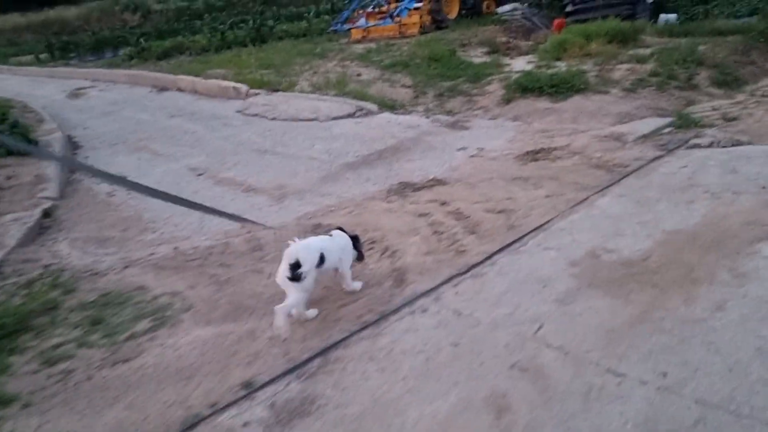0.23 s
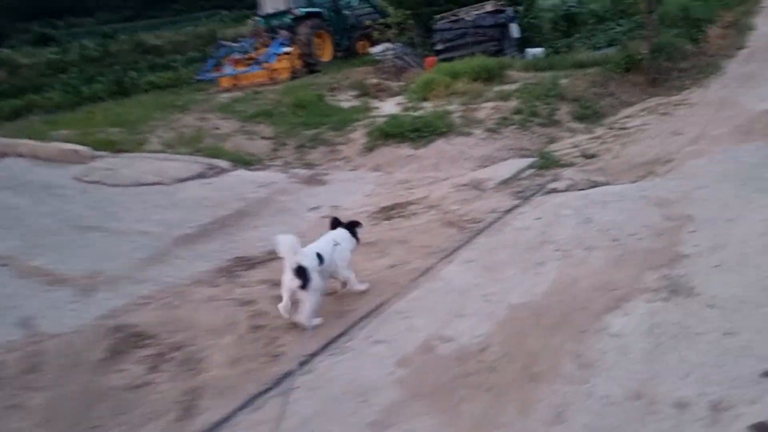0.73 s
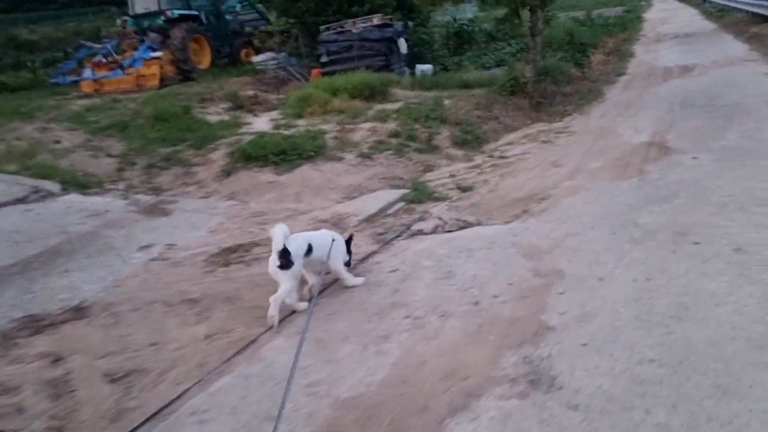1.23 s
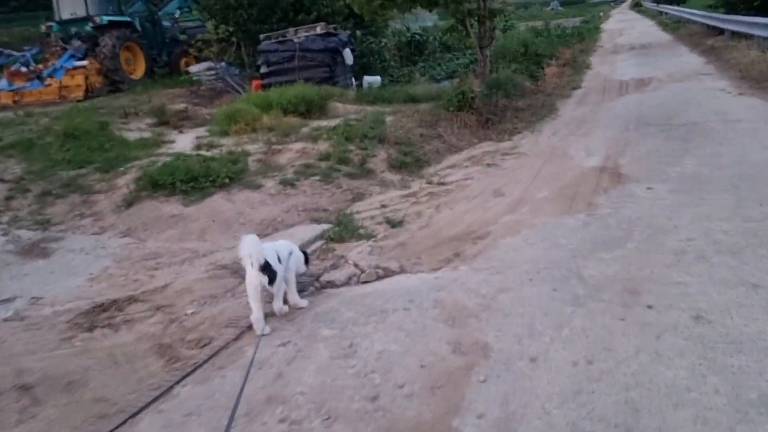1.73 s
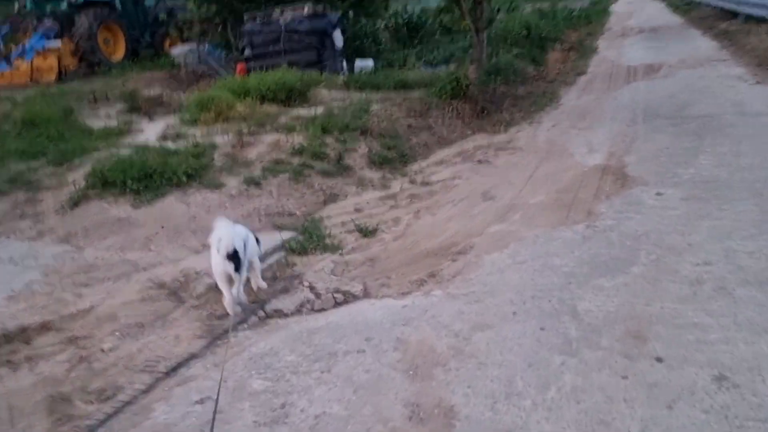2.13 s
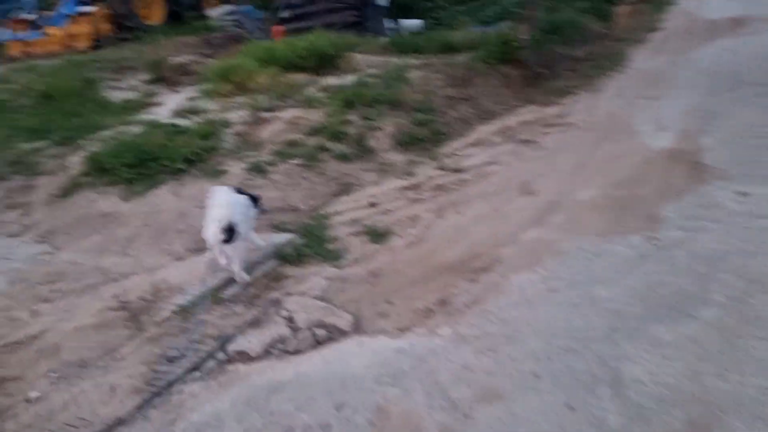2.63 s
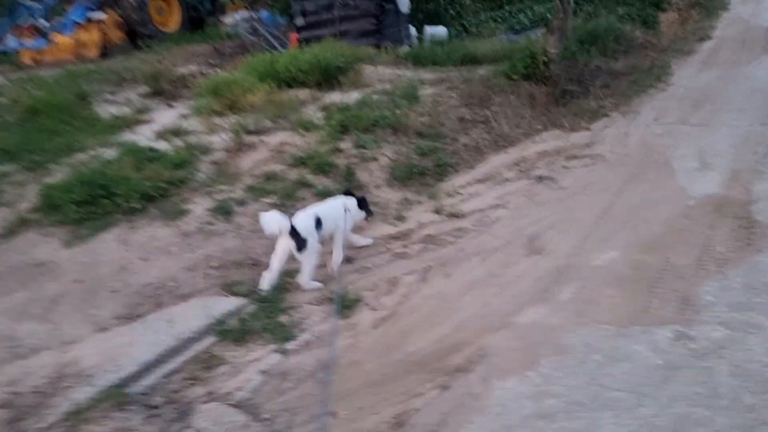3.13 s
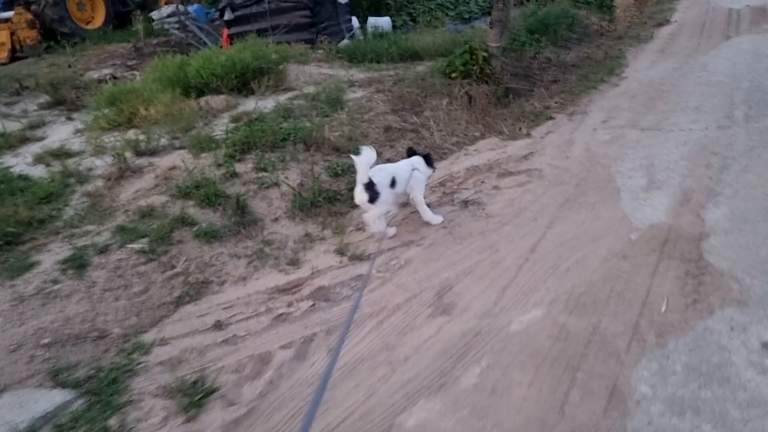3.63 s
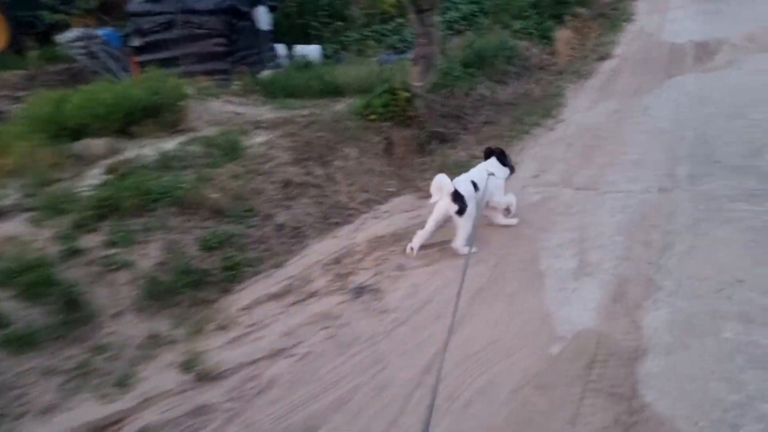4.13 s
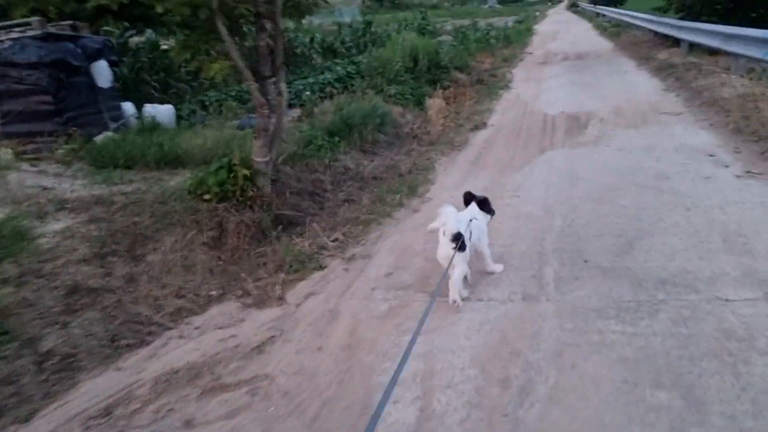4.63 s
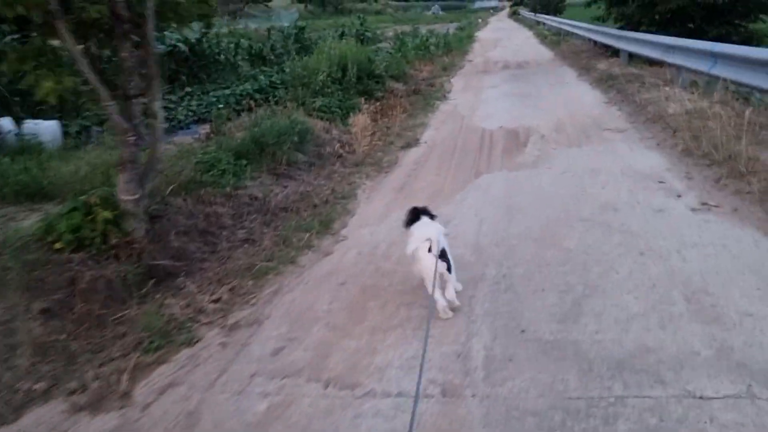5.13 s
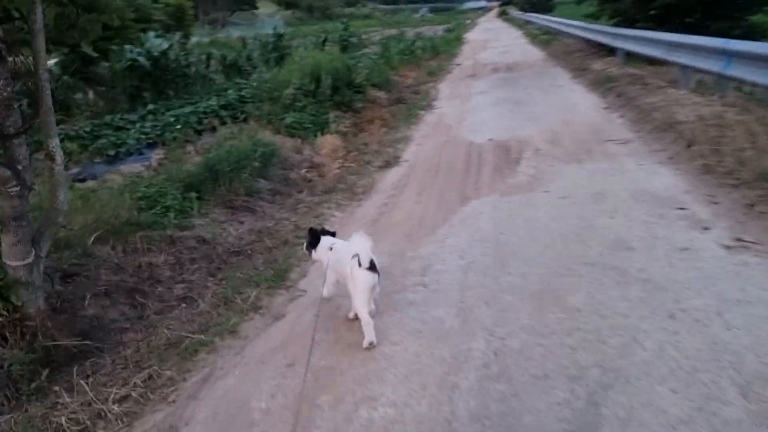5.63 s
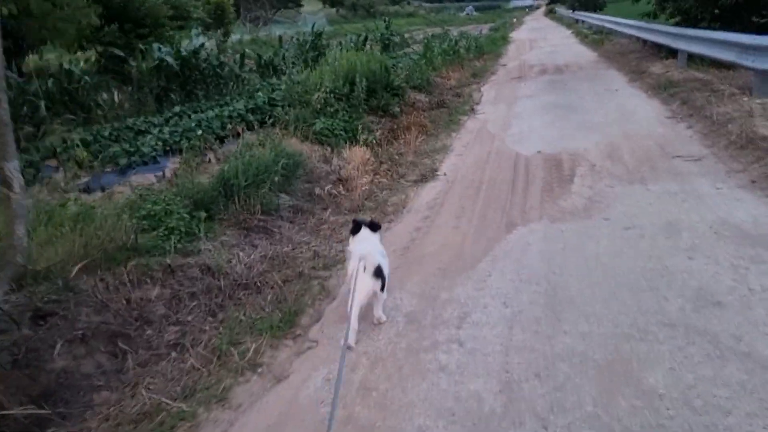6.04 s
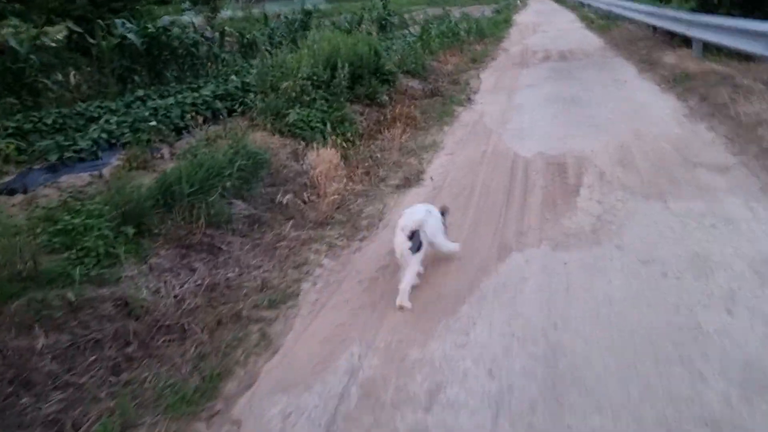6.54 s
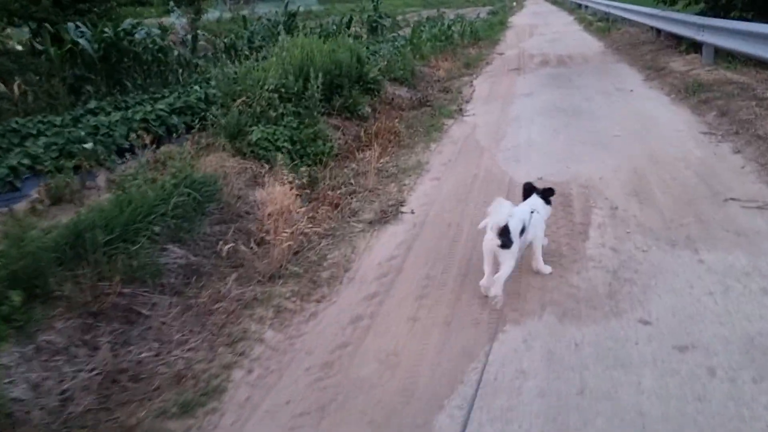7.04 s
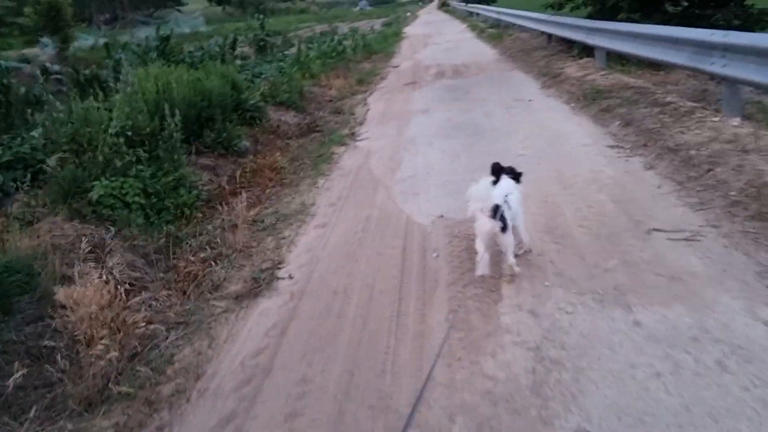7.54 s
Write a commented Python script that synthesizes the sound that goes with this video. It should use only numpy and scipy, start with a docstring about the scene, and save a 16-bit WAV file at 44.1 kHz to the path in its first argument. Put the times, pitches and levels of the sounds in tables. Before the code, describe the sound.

Close-up dog walk: sharp plastic clicks, tiny bright metal jingles, gritty soft footsteps about twice a second, and dull rumbling air outdoors.

```python
"""Small dog on a retractable leash

A small dog is walked along a sandy concrete lane, its leash held close to two microphone ports.
The plastic reel clacks as knocks with body and shell rings; clip and collar are decaying metal modes.
Soles and crushed sand are dense random grains, with loose pebbles skittering as band-passed pips.
Air buffets the ports as low coloured noise, over faint open air with a few far-off gliding calls.
"""
import sys
import numpy as np
from scipy import signal
from scipy.fft import rfft, irfft, next_fast_len
from scipy.io import wavfile
from scipy.ndimage import uniform_filter1d

SR = 44100
rng = np.random.default_rng(int(sys.argv[2]) if len(sys.argv) > 2 else 0)


def generate_wav(sig):
    """Save sig (samples, or channels by samples) to the path in sys.argv[1] as 16-bit PCM at SR."""
    pcm = np.round(np.clip(np.atleast_2d(sig).T, -1, 1) * 32767).astype(np.int16)
    wavfile.write(sys.argv[1], SR, pcm)


N = 343121  # samples
TIME = np.arange(N) / SR  # s


def undb(db):
    """Decibels to gain."""
    return 10 ** (np.asarray(db) / 20)


def unit(x):
    """Scale to rms 1."""
    return x / np.sqrt(np.mean(x ** 2) + 1e-20)


def blow(x):
    """Scale a short sound to the energy of 10 ms at rms 1."""
    energy = np.mean(np.sum(x ** 2, axis=-1))
    return x / np.sqrt(energy / (SR / 100) + 1e-20)


def sides(db):
    """Left and right gains for a level difference, left minus right."""
    return undb(np.array([[db], [-db]]) / 2)


def fade(t, t60):
    """Exponential decay by 60 dB in t60 seconds, 1 ms at the shortest."""
    return np.exp(-np.log(1000) * t / max(t60, 1e-3))


def swell(t, s, half_length):
    """Smooth bell-shaped rise and fall around time s."""
    return np.exp(-.5 * ((t - s) / half_length) ** 2)


def colour(x, points):
    """Causal minimum-phase filter through (Hz, dB) points, built from the cepstrum."""
    hz, db = np.transpose(points)
    size = 2 * next_fast_len(x.shape[-1] // 2 + 1024)
    f = np.arange(size // 2 + 1) * SR / size
    cepstrum = irfft(np.log(undb(np.interp(np.log(f + 1), np.log(hz), db))))
    # folding the cepstrum forward puts the energy as early as possible
    cepstrum[1:size // 2] *= 2
    cepstrum[size // 2 + 1:] = 0
    return irfft(rfft(x, size) * np.exp(rfft(cepstrum)), size)[..., :x.shape[-1]]


def band(x, lo_hz, hi_hz):
    """Band-pass."""
    edges = [lo_hz, min(hi_hz, SR / 2 - 100)]
    return signal.sosfilt(signal.butter(3, edges, "band", fs=SR, output="sos"), x)


def brighten(x, treble_db):
    """Give the part above 5 kHz its share of the energy: a harder contact is brighter."""
    spectrum = rfft(x)
    hz = np.arange(spectrum.shape[-1]) * SR / x.shape[-1]
    upper = 1 / (1 + (5000 / (hz + 1)) ** 8)
    high = irfft(spectrum * upper, x.shape[-1])
    share = min(undb(treble_db) ** 2, .8)
    return blow(np.sqrt(1 - share) * blow(x - high) + np.sqrt(share) * blow(high))


def ports(shared, own, likeness, count=13):
    """Two microphone ports: the shared sound reaches the right one count samples later."""
    likeness = np.clip(likeness, 0, 1)
    late = np.pad(shared, (count, 0))[:-count]
    return np.sqrt(likeness) * np.stack([shared, late]) + np.sqrt(1 - likeness) * own


def walk(rate):
    """Slow random drift with a spread near 1, stepping rate times a second and smoothed."""
    k = max(int(SR / rate), 2)
    steps = np.repeat(rng.standard_normal(N // k + 1), k)
    return unit(uniform_filter1d(uniform_filter1d(steps, k), k)[:N])


def ring(t, modes, spread=.5):
    """Decaying sine modes, met by each port in a different phase (spread in radians)."""
    out = 0
    for hz, db, t60 in modes:
        phase = spread * rng.standard_normal((2, 1))
        out = out + undb(db) * fade(t, t60) * np.sin(2 * np.pi * hz * t + phase)
    return out


def add(out, s, x):
    """Mix a short sound in at time s."""
    i = int(np.clip(s * SR, 0, N - 1))
    out[:, i:i + x.shape[1]] += x[:, :N - i]


def crack(t, t60, points, likeness, tail_db, tail_t60, rise):
    """A contact's dense, quickly dying noise, then weak, ragged chatter and scatter."""
    noise = rng.standard_normal((3, len(t)))
    ragged = undb(4 * unit(uniform_filter1d(rng.standard_normal(len(t)), SR // 600)))
    tail = undb(tail_db) * ragged * fade(t, tail_t60)
    envelope = (1 - fade(t, rise)) * (fade(t, t60) + tail)
    return colour(ports(noise[0], noise[1:], likeness) * envelope, points)


# low-heavy spectrum of the rumble: (f/Hz, level/dB)
WIND_SPECTRUM = [(15, -11), (30, -7), (55, 1), (85, -0.5), (120, -13), (170, -20.5), (300, -28), (700, -44),
                 (2000, -63)]
# airflow on the ports, before trim, flutter and pan: (t/s, level/dB)
AIRFLOW_LEVELS = [(0.01, -45), (0.24, -54.5), (1.21, -38), (1.72, -48.5), (2.25, -42), (2.46, -59.5),
                  (2.65, -45), (2.73, -51.5), (3.25, -41), (3.88, -49), (4.17, -37), (4.47, -63.5),
                  (4.68, -41.5), (5.08, -50.5), (5.22, -45.5), (5.32, -54), (5.92, -53.5), (6.04, -35.5),
                  (6.39, -73), (6.63, -43.5), (7.62, -37), (7.78, -47.5)]
# sudden buffets, level before pan: (t/s, level/dB, half length/s, eddies relative to the push/dB)
WIND_BUFFETS = [(0.601, -31.5, 0.018, -15.5), (0.787, -30.5, 0.015, -15.5), (1.112, -32.5, 0.029, -7),
                (2.875, -41.5, 0.031, -14), (4.991, -40.5, 0.024, -16.5), (6.85, -40.5, 0.016, -4),
                (7.191, -26.5, 0.016, -3.5)]


def wind(trim_db=-1, flutter_db=2.5, push_hz=82, pan_db=7.9):
    """Eddies rumble on each port separately, most on the left; hard buffets reach higher in pitch."""
    rumble = colour(rng.standard_normal((2, N)), WIND_SPECTRUM)
    # even out the level first, so that the airflow alone sets it
    rumble /= np.sqrt(uniform_filter1d(np.mean(rumble ** 2, axis=0), SR // 12))
    airflow_db = np.interp(TIME, *np.transpose(AIRFLOW_LEVELS))
    out = rumble * undb(airflow_db + trim_db + flutter_db * walk(18))
    eddy_spectrum = [(30, -31), (130, 14.0), (210, 9.0), (300, -3.0), (500, -20), (1000, -28), (4000, -74)]
    eddies = unit(colour(rng.standard_normal((2, N)), eddy_spectrum))
    for s, db, half, eddy_db in WIND_BUFFETS:
        phase = 1.0 * walk(50) + .5 * rng.standard_normal((2, 1))  # unsteady, and different at each port
        push = np.sqrt(2) * np.sin(2 * np.pi * push_hz * (TIME - s) + phase)
        out += undb(db) * swell(TIME, s, half) * (push + undb(eddy_db) * eddies)
    return sides(pan_db) * out


# spectrum of the open air: (f/Hz, level/dB)
AIR_SPECTRUM = [(15, -19), (30, -8.5), (78, -3.5), (130, -18.5), (190, -25.5), (360, -17), (600, -23),
                (950, -24), (1700, -26), (2600, -28), (4500, -32), (7200, -33), (8600, -46.5), (15500, -42),
                (16500, -62)]
# far-off calls: (t/s, length/s, start f/Hz, end f/Hz, level/dB, octave relative to the call/dB)
FAR_CALLS = [(2.805, 0.072, 1047, 1080, -60, 6.5), (6.092, 0.085, 926, 923, -59.5, -13),
             (6.425, 0.075, 900, 970, -53, -8), (7.701, 0.077, 886, 1016, -54, -5)]


def countryside(air_db=-61, waver_db=4.0, call_wobble=0.025):
    """Quiet open air as wavering noise; each distant call is a short gliding tone with its octave."""
    noise = rng.standard_normal((3, N))
    air = colour(ports(noise[0], noise[1:], 0.25, count=1), AIR_SPECTRUM)
    out = air / np.std(band(air, 250, 16000)) * undb(air_db + waver_db * walk(12))
    for s, length, start_hz, end_hz, db, octave_db in FAR_CALLS:
        u = np.linspace(0, 1, int(length * SR))
        glide = start_hz + (end_hz - start_hz) * u
        pitch = glide * (1 + call_wobble * walk(310)[:len(u)])
        phase = 2 * np.pi * np.cumsum(pitch) / SR
        voice = np.sin(phase) + undb(octave_db) * np.sin(2 * phase)
        add(out, s, sides(0) * undb(db) * np.sin(np.pi * u) * voice)
    return out


def grains(rate, spread_db):
    """Dense grains of very uneven size; each cracks for a millisecond or so in each octave band."""
    noise = rng.standard_normal((3, N))
    hiss, out = ports(noise[0], noise[1:], 0.17), 0
    for hz in 600 * 2 ** np.arange(5):
        hits = rng.random(N) < rate / SR
        size = hits * undb(spread_db * np.minimum(rng.exponential(size=N), 4))
        power = signal.lfilter([1], [1, -np.exp(-1 / (0.0015 * SR))], size ** 2)
        power /= uniform_filter1d(power, SR // 10) + 1e-9
        # a faint floor fills the gaps; shifting the hiss gives each band its own noise
        cracks = np.sqrt(np.abs(power) + 0.028) * np.roll(hiss, int(hz), axis=1)
        out = out + band(cracks, hz / 2, hz * 2)
    return out


def tread(s, half, push_db, push_off_s=0.23, push_off_half_s=0.051):
    """Pressure on the ground: one shoe rolls down, then the other pushes off more lightly."""
    return swell(TIME, s, half) + undb(push_db) * swell(TIME, s + push_off_s, push_off_half_s)


# spectrum of the dragging sole: (f/Hz, level/dB)
SOLE_SPECTRUM = [(100, -45.5), (380, 2.5), (750, 5.5), (1400, -1.5), (2500, 1.5), (3400, -7.5), (6000, -62),
                 (12000, -50.5)]
# spectrum of the crushed sand: (f/Hz, level/dB)
GRIT_SPECTRUM = [(800, -10.5), (2000, -23), (3200, 1), (5500, 2.5), (7400, -4), (8600, -5), (11000, -14),
                 (15400, -1), (16500, -50)]
# footfalls, about two a second, levels before trim and pan:
# (t/s, half length of the roll/s, sole level/dB, grit level/dB)
FOOTFALLS = [(.125, 0.039, -50, -60), (.54, 0.044, -54.5, -53.5), (1.161, 0.052, -51, -57.5),
             (1.55, 0.043, -52, -52), (2.085, 0.073, -55.5, -57.5), (2.58, 0.047, -51.5, -61.5),
             (3.047, 0.049, -55, -60.5), (3.545, 0.049, -56.5, -53.5), (4.13, .07, -49, -56.5),
             (4.515, 0.072, -56, -52.5), (5.024, .038, -50, -60.5), (5.48, .055, -51, -48),
             (6.06, 0.069, -53.5, -61.5), (6.48, 0.084, -54, -55.5), (7.07, .08, -54.5, -63),
             (7.42, 0.049, -56, -53)]


def grit(sole_trim_db=-1, push_sole_db=-9, push_grit_db=-6.5, pan_db=-1.0):
    """Soles drag over concrete and crush sand into dense crackle, in time with the tread."""
    press = sum(undb(sole) * tread(s, half, push_sole_db) for s, half, sole, _ in FOOTFALLS)
    crush = sum(undb(sand) * tread(s, half, push_grit_db) for s, half, _, sand in FOOTFALLS)
    brush = unit(colour(grains(rate=450, spread_db=6.5), SOLE_SPECTRUM))
    crackle = unit(colour(grains(rate=330, spread_db=11.0), GRIT_SPECTRUM))
    return sides(pan_db) * (undb(sole_trim_db) * press * brush + crush * crackle)


def pebbles(above_grit_db=4, spread_db=4.0, scatter=1.1, hz=2700, t60=0.0087, count=8):
    """Single grains skitter while each shoe rolls down, louder where the ground is grittier."""
    out, t = np.zeros((2, N)), np.arange(SR // 40) / SR
    for s, half, _, grit_db in FOOTFALLS:
        for when, size, strength in np.clip(rng.standard_normal((count, 3)), -2, 2):
            pitch = hz * np.exp(0.52 * np.tanh(size))
            burst = rng.standard_normal((2, len(t))) * fade(t, t60)
            pip = blow(band(burst, pitch * .3, pitch * 1.8))
            pressure = swell(when, 0, 2.4)
            level = undb(grit_db + above_grit_db + spread_db * strength)
            add(out, s + scatter * half * when, sides(-1.5) * pressure * level * pip)
    return out


# spectrum of a small hard contact: (f/Hz, level/dB)
TICK_SPECTRUM = [(100, -22.5), (400, 0), (900, 0.5), (1500, 4), (2800, 5), (5000, -2), (7200, -4.5),
                 (9000, -20), (15000, -18.5), (17000, -46)]
# sharp ticks of clip, line and grit, treble share capped and t60 before stretch:
# (t/s, level/dB, treble share/dB, t60/s)
SHARP_TICKS = [(0.1447, -43, -5, 0.0057), (0.4216, -46.5, -33, 0.003), (0.445, -46, -8, 0.0056),
               (0.5107, -39.5, -10.5, 0.005), (0.6414, -41, -2.5, 0.0076), (0.7485, -41, -17, 0.0061),
               (0.776, -41.5, -3, 0.018), (1.0018, -42, -6, 0.015), (1.4772, -41.5, -13, 0.03),
               (1.4835, -39.5, -7.5, 0.003), (1.545, -41, -1.5, 0.024), (1.56, -33.5, -7, 0.0016),
               (1.6342, -39.5, -9, 0.018), (1.786, -40.5, 0, 0.0097), (2.1647, -44.5, -7.5, 0.006),
               (2.2242, -41, -4.5, 0.0089), (2.5038, -34.5, -10.5, 0.0024), (2.806, -33.5, -3, 0.0044),
               (3.4588, -37.5, -13, 0.005), (3.5204, -35.5, -6, 0.005), (3.593, -34.5, -10, 0.019),
               (3.7693, -40, -1, 0.0085), (4.4183, -43.5, -10, 0.0033), (4.4275, -38, -6, 0.0025),
               (4.497, -36, -10, 0.025), (4.5115, -34.5, -13.5, 0.0056), (4.5373, -33, -6, 0.043),
               (4.7498, -35.5, -5, 0.0065), (5.0736, -42, -34, 0.003), (5.1834, -42, -8.5, 0.0042),
               (5.2851, -44, -13, 0.0063), (5.3119, -40.5, -8, 0.0055), (5.3388, -41.5, -6, 0.0037),
               (5.4392, -38.5, -11, 0.012), (5.4758, -41.5, -33, 0.0079), (5.5367, -35, -3, 0.018),
               (5.728, -32, 0, 0.028), (5.913, -37, -8.5, 0.034), (6.3456, -40, -10.5, 0.0048),
               (6.3856, -40.5, 0, 0.069), (6.578, -42, -31, 0.012), (6.908, -42.5, -7, 0.016),
               (7.324, -38, -9.5, 0.0044), (7.4959, -36, -10, 0.014), (7.596, -40.5, -12.5, 0.0029)]


def ticks(stretch=3.3, soft_hz=2597, hard_rise_hz=4450, ring_db=-3, ring_t60=0.022, pan_db=-1.5,
          scrape_db=-21, scrape_t60=0.11, rebound_db=-15):
    """Small hard contacts: a faint scrape, a sharp snap with its own short ring, and a light rebound."""
    out, t = np.zeros((2, N)), np.arange(SR // 10) / SR
    for s, db, treble_db, t60 in SHARP_TICKS:
        # a harder, brighter contact rings higher
        ring_hz = soft_hz + hard_rise_hz * min(undb(treble_db), 1) ** 2
        tick = blow(crack(t, stretch * t60, TICK_SPECTRUM, likeness=0.18, tail_db=-25, tail_t60=0.2, rise=.0004))
        snap = blow(colour(rng.standard_normal((2, len(t))) * fade(t, .003), TICK_SPECTRUM))
        cluster = [(ring_hz, 0, ring_t60)]
        cluster += [(ring_hz * np.exp(0.295 * z), -6, ring_t60) for z in rng.standard_normal(3)]
        tink = undb(ring_db) * blow(ring(t, cluster, spread=1.39))
        add(out, s, undb(db) * sides(pan_db) * brighten(snap + tick + tink, treble_db))
        rebound = blow(band(snap, ring_hz / 2, ring_hz * 2))
        add(out, s + rng.uniform(.004, 0.02), undb(db + rebound_db) * rebound)
        # the scrape grows until the snap
        scrape = blow(colour(rng.standard_normal((2, len(t))) * fade(t[::-1], scrape_t60), TICK_SPECTRUM))
        add(out, s - t[-1], undb(db + scrape_db) * scrape)
    return out


# modes of the snap hook, before detune, part level and grip: (f/Hz, level/dB, t60/s)
HOOK_MODES = [(5443, 4, 0.14), (6896, -18, 0.13), (14660, 4, 0.3)]
# modes of the collar ring, likewise: (f/Hz, level/dB, t60/s)
RING_MODES = [(7730, -4, 0.037), (9900, -21, 0.13), (9420, 1, 0.13)]
# modes of the swivel, likewise: (f/Hz, level/dB, t60/s)
SWIVEL_MODES = [(15190, 2.5, 0.11), (15330, -6, .06), (14950, -12, .04)]
# stronger jingles, level before trim: (t/s, level/dB, hook above it/dB, swivel above it/dB)
STRONG_JINGLES = [(.445, -59, -18, 9), (.495, -47.5, -20, -7), (.841, -54.5, -26, -4),
                  (1.114, -60, -20, -8), (1.549, -50, -19, 15.5), (1.845, -60.5, -18, 3),
                  (2.225, -52.5, -12, -12), (2.812, -53.5, -25, 8), (3.498, -48.5, -24, -7),
                  (3.609, -49, -19, 5), (4.17, -50.5, -18, -9), (4.56, -55.5, -15, 8),
                  (5.102, -52, -22, 15), (5.285, -56, -20, -2), (5.369, -53, -18, -12),
                  (5.545, -48, -14, -6), (6.385, -44.5, -10, -1), (6.698, -51.5, -20, -3),
                  (7.321, -56, -14, 3), (7.385, -55, -4, -7), (7.459, -53.5, -22, 1)]


def jingles(trim_db=3, idle_db=-68, idle_hook_db=-24, idle_swivel_db=-4, idle_spread_db=4.5,
            chatter=0.47, touch_db=-4, count=55):
    """Hook, ring and swivel click and ring when they meet; softer tinkles fall at random in between."""
    out, t = np.zeros((2, N)), np.arange(SR // 4) / SR
    chance = np.clip(rng.standard_normal((count, 3)), -2, 2)
    idle_levels = np.array([idle_db, idle_hook_db, idle_swivel_db]) + idle_spread_db * chance
    idle = np.column_stack([rng.uniform(0, N / SR, count), idle_levels])
    for s, db, hook_db, swivel_db in list(STRONG_JINGLES) + list(idle):
        grip = np.exp(-abs(0.18 * rng.standard_normal()))  # a taut line damps the metal more
        modes = []
        for part, part_db in ((HOOK_MODES, hook_db), (RING_MODES, 0), (SWIVEL_MODES, swivel_db)):
            for hz, mode_db, t60 in part:
                modes.append((hz * (1 + 0.0012 * rng.standard_normal()), mode_db + part_db, t60 * grip))
        click = rng.standard_normal((2, len(t))) * fade(t, 0.006)
        touch = undb(touch_db) * blow(band(click, 4000, 17000))
        metal = ring(t, modes, spread=1.0) * (1 - fade(t, 0.0038))
        add(out, s, undb(db + trim_db) * (touch + metal))
    return out * (1 + chatter * walk(500))  # the parts keep rubbing while they ring


# spectrum of knock and sliding line: (f/Hz, level/dB)
CLACK_SPECTRUM = [(100, -35.5), (220, -23.5), (350, -1.5), (800, 2), (1400, -4), (2800, -3.5), (4600, -8),
                  (6500, -14.5), (8500, -25.5), (15000, -32), (17000, -33)]
# modes of the reel's plastic case, before each knock's random shifts: (f/Hz, level/dB, t60/s)
CASE_MODES = [(401, -18, 0.097), (720, -11, 0.014), (1090, -39, 0.016), (1840, -13, 0.033),
              (2485, 5, 0.031), (2936, 10, 0.013), (3510, 0.5, 0.022), (4700, 8, 0.017)]
# clacks of the reel, body before its trim and t60 before stretch:
# (t/s, level/dB, hollow body/dB, treble share/dB, left minus right/dB, t60/s, body f/Hz, shell f/Hz)
REEL_CLACKS = [(0.5314, -35.5, -5.5, -7, 0, 0.0098, 570, 2830),
               (0.9068, -32.5, 0.5, -15.5, 4, 0.024, 588, 3350),
               (2.0647, -28.5, -9, -6.5, 1.5, 0.013, 883, 2410),
               (2.5365, -17, -12, -12.5, -1, 0.013, 484, 2750), (3.0569, -29, 2, -9.5, 2, 0.014, 600, 2980),
               (3.3783, -29, -3.5, -12, 3.5, 0.014, 744, 3200),
               (3.9654, -29, -3.5, -9, 2, 0.0086, 545, 2404),
               (4.2855, -26, -2.5, -10, 3.5, 0.011, 780, 3330),
               (4.7196, -31, 1.5, -19, -1.5, 0.0093, 526, 2450),
               (5.1242, -30.5, -5, -17, -1, 0.034, 496, 2430), (5.5007, -36, -7, -25, -2, 0.022, 400, 2330),
               (6.3939, -34.5, -1.5, -36, -1.5, 0.019, 403, 2430),
               (6.6759, -27.5, -21, -11, 4.5, 0.0062, 965, 3300),
               (7.0916, -31.5, -5.5, -14, 2.5, 0.021, 466, 2390)]


def reel(case_db=-5, shell_db=-10, body_trim_db=-5.5, body_pan_db=6.2, body_t60=0.035, shell_t60=0.036,
         stretch=1.9, slide_db=-21, slide_t60=0.028):
    """The line slides taut, then the spool knocks against its hollow plastic case."""
    out, t = np.zeros((2, N)), np.arange(SR // 5) / SR
    for s, db, body_db, treble_db, pan_db, t60, body_hz, shell_hz in REEL_CLACKS:
        knock = blow(crack(t, stretch * t60, CLACK_SPECTRUM, likeness=0.33, tail_db=-25.5, tail_t60=0.2,
                           rise=0.00078))
        # each knock lands elsewhere on the case, under a slightly different grip
        modes = [(hz * np.exp(0.047 * rng.standard_normal()), level + 2 * rng.standard_normal(), decay)
                 for hz, level, decay in CASE_MODES]
        case = undb(case_db) * blow(ring(t, modes, spread=2.12))
        shell = undb(shell_db) * blow(ring(t, [(shell_hz, 0, shell_t60)], spread=3.0))
        body = blow(ring(t, [(body_hz, 0, body_t60)], spread=0))
        body = undb(body_db + body_trim_db) * sides(body_pan_db) * body
        clack = brighten(knock + case + shell, treble_db) + body
        add(out, s, undb(db) * sides(pan_db) * clack)
        # the slide grows until the knock
        slide = blow(colour(rng.standard_normal((2, len(t))) * fade(t[::-1], slide_t60), CLACK_SPECTRUM))
        add(out, s - t[-1], undb(db + slide_db) * slide)
    return out


def scene():
    """Air, footsteps, collar and leash together."""
    return wind() + countryside() + grit() + pebbles() + ticks() + jingles() + reel()


def record(dry):
    """The left port is slightly fuller near 600 Hz, the right near 1.3 and 4.4 kHz; 16 kHz up is cut."""
    # left port's tilt, mirrored on the right: (f/Hz, level/dB)
    difference = np.array([(200, -0.6), (600, 0.5), (1300, -2.5), (2300, -0.97), (4400, -1.05),
                           (8000, 0.1), (15000, 0.0)])
    heard = np.stack([colour(dry[0], difference), colour(dry[1], difference * [1, -1])])
    return signal.sosfilt(signal.ellip(8, .2, 70, 16000, fs=SR, output="sos"), heard)


dry = scene()
out = record(dry)
generate_wav(out)
```